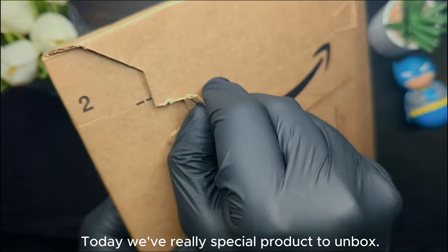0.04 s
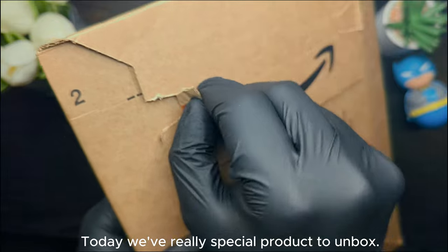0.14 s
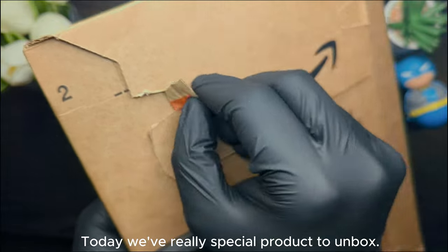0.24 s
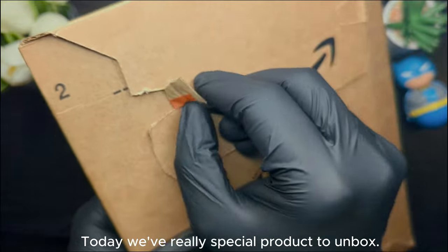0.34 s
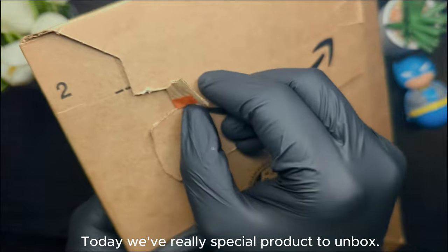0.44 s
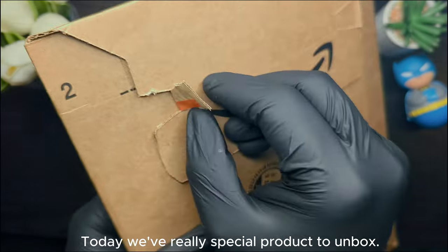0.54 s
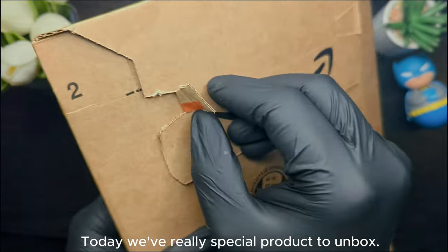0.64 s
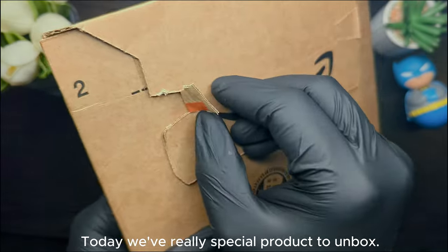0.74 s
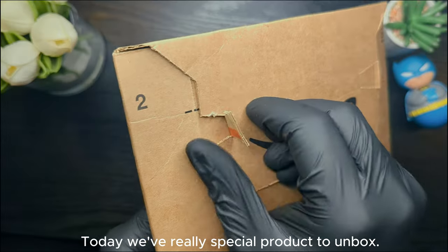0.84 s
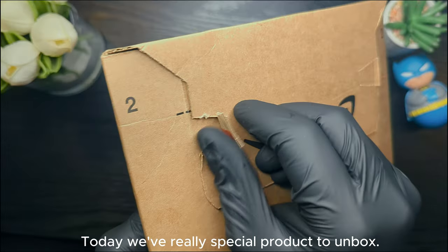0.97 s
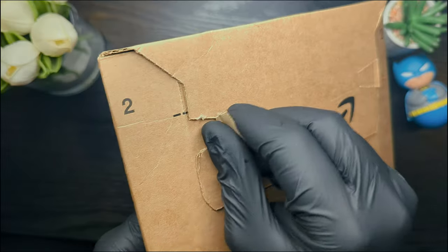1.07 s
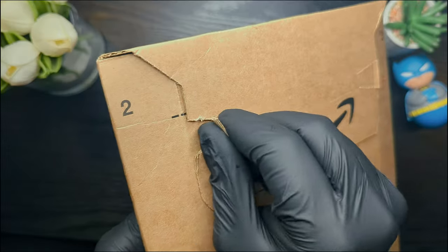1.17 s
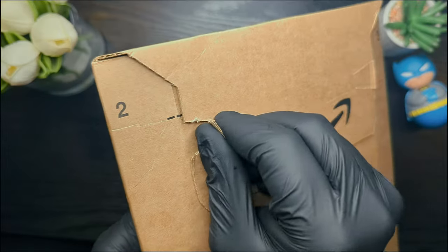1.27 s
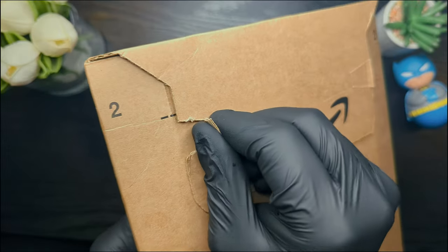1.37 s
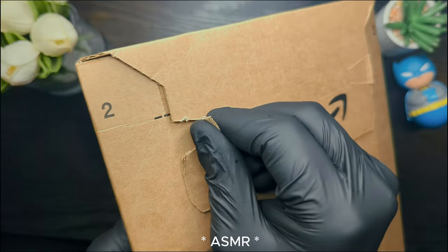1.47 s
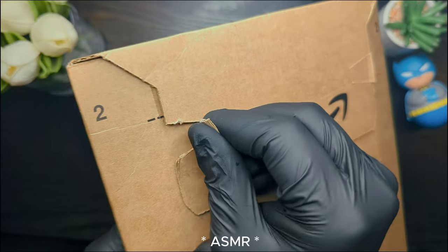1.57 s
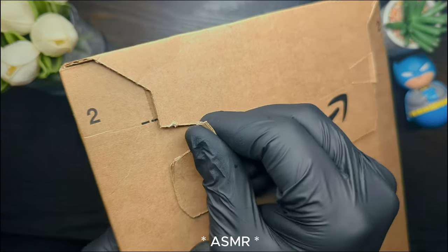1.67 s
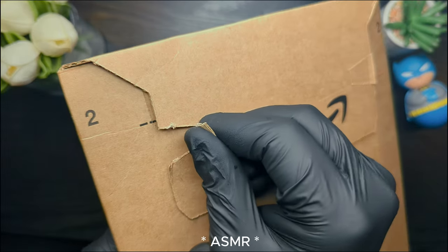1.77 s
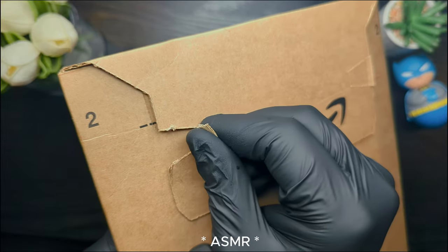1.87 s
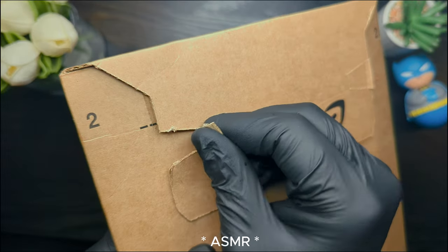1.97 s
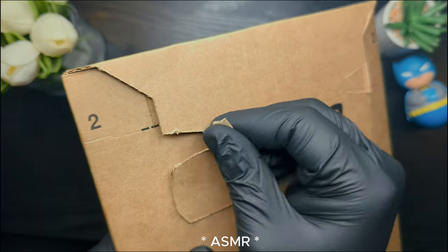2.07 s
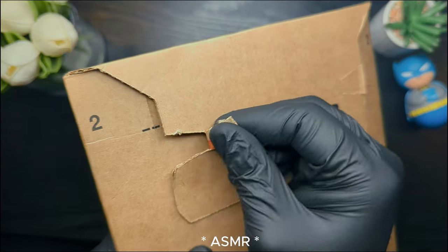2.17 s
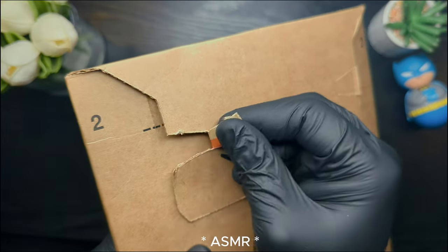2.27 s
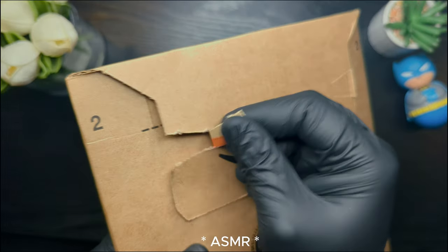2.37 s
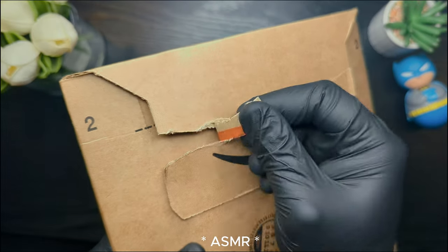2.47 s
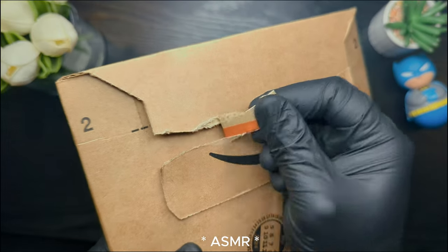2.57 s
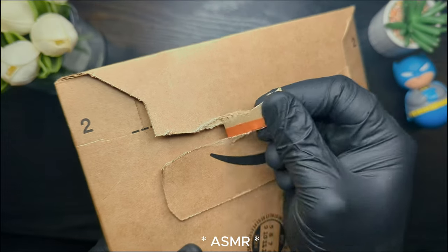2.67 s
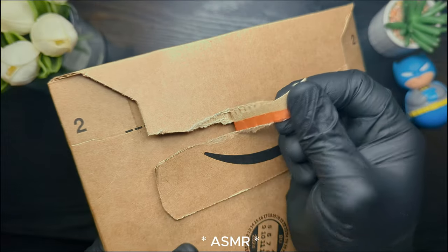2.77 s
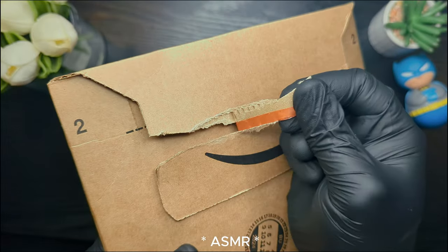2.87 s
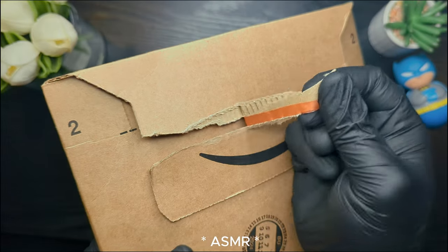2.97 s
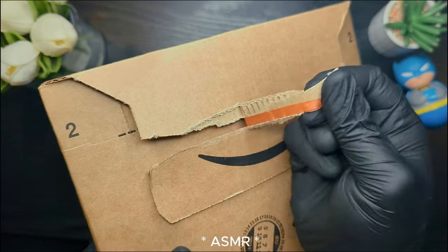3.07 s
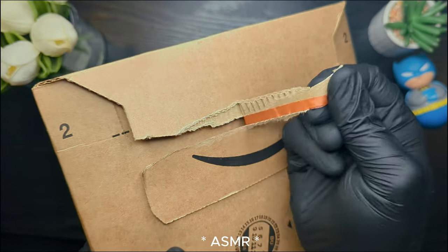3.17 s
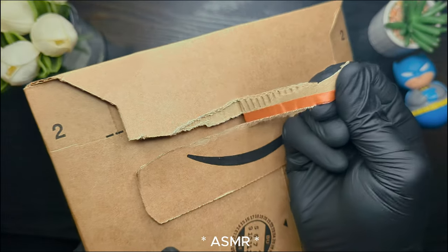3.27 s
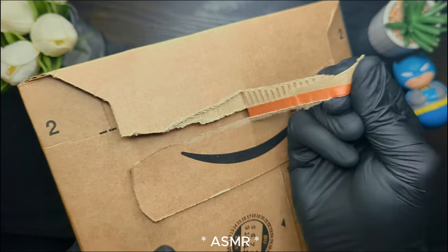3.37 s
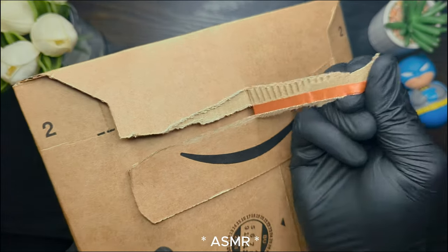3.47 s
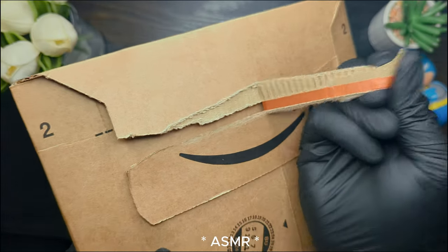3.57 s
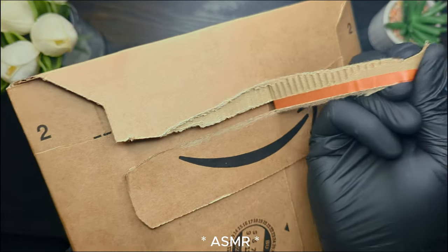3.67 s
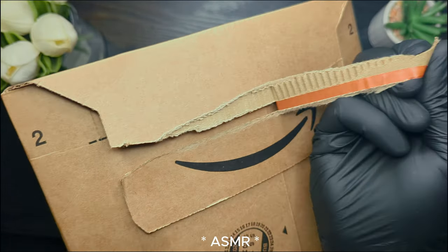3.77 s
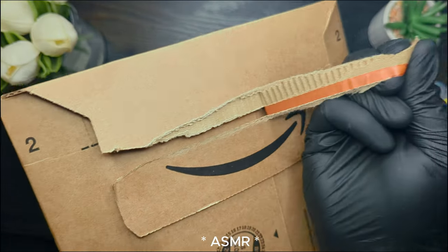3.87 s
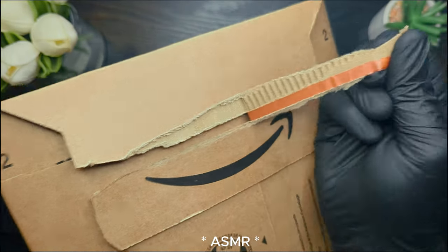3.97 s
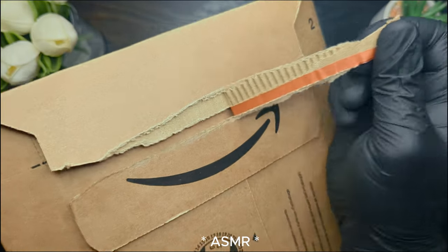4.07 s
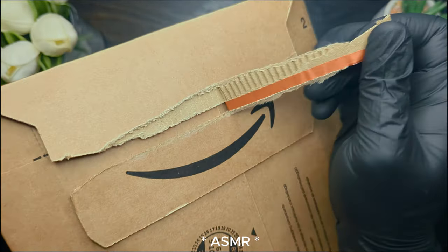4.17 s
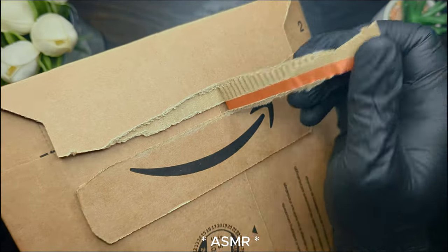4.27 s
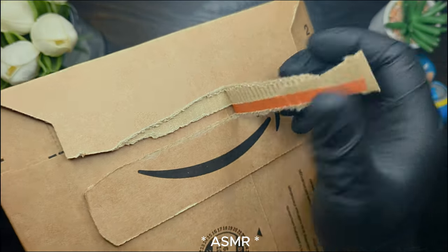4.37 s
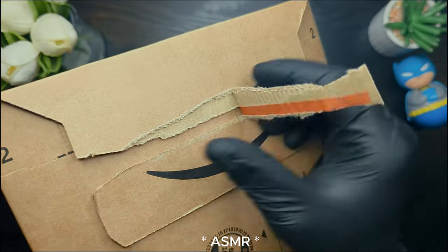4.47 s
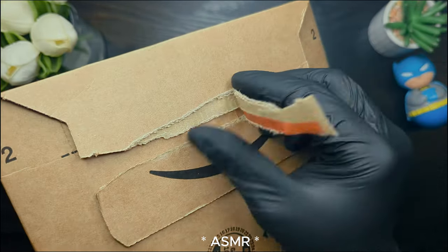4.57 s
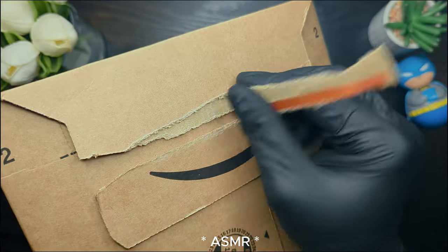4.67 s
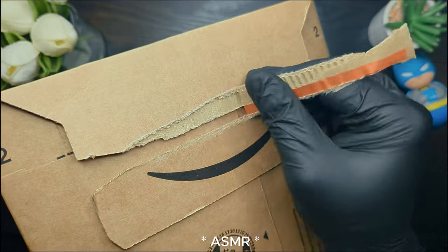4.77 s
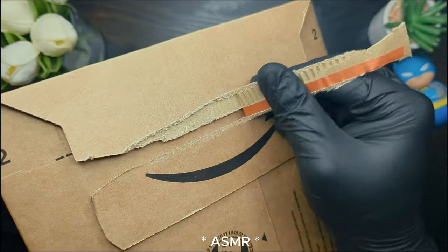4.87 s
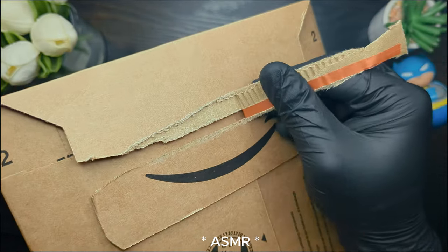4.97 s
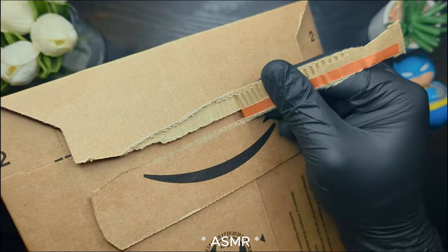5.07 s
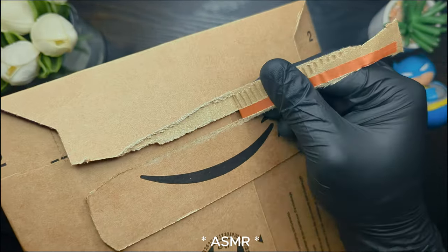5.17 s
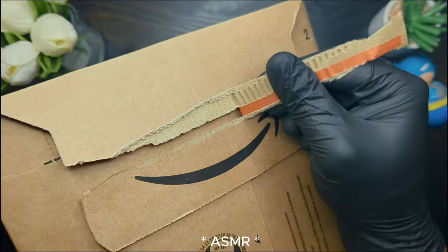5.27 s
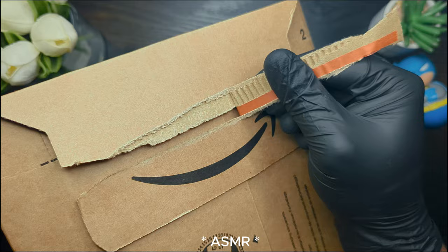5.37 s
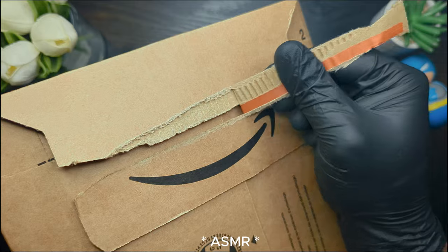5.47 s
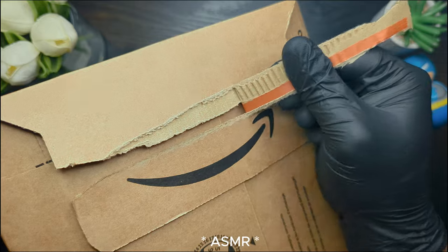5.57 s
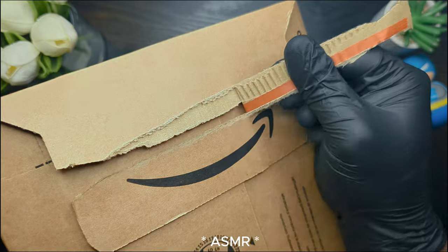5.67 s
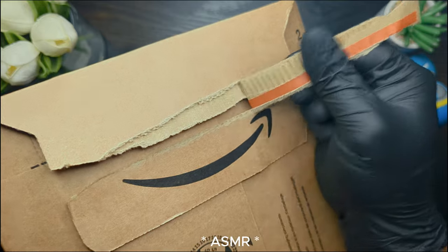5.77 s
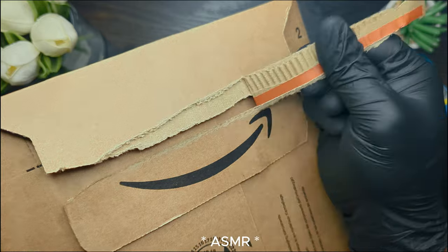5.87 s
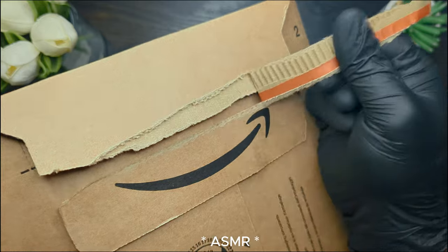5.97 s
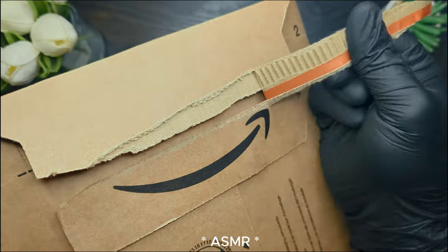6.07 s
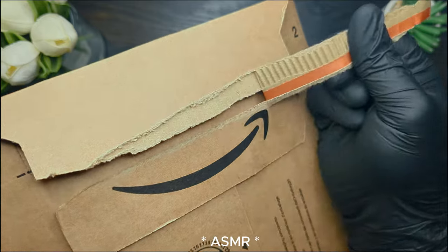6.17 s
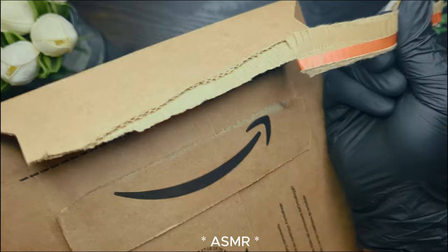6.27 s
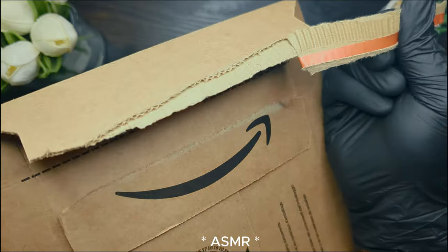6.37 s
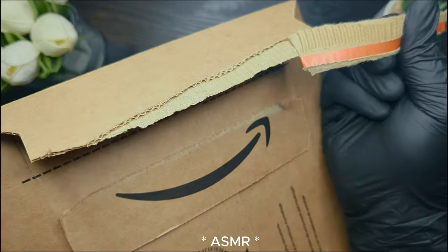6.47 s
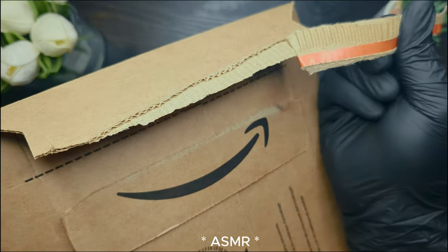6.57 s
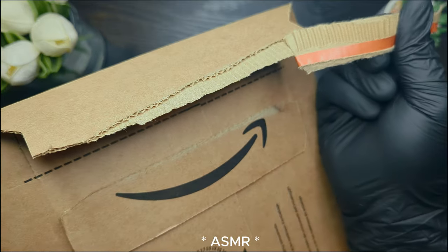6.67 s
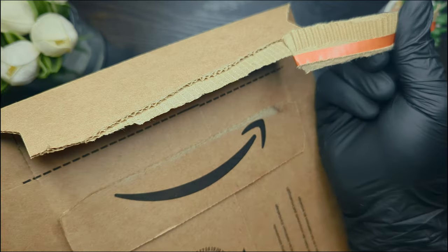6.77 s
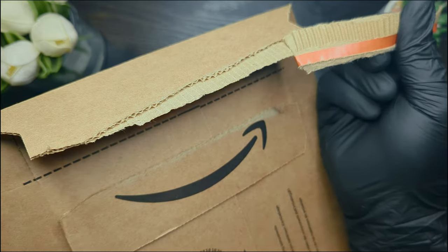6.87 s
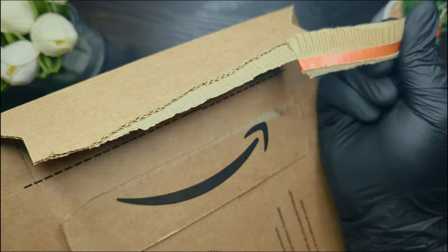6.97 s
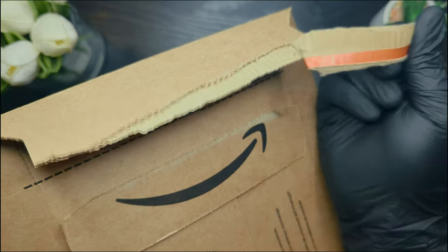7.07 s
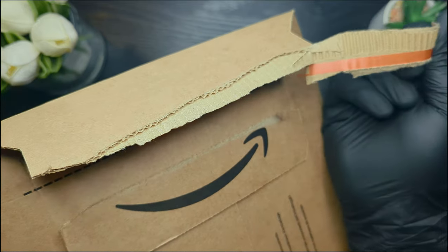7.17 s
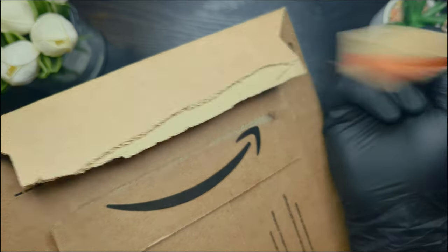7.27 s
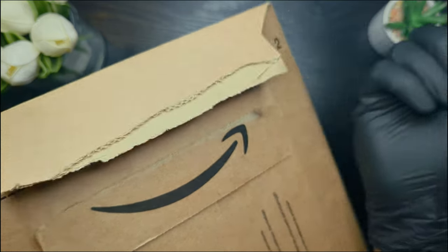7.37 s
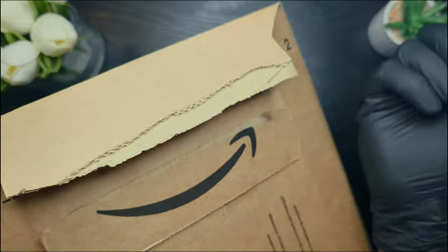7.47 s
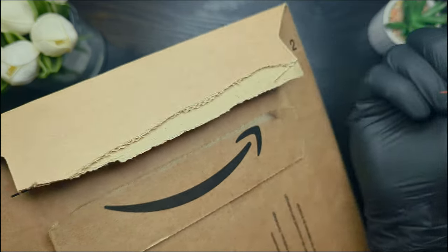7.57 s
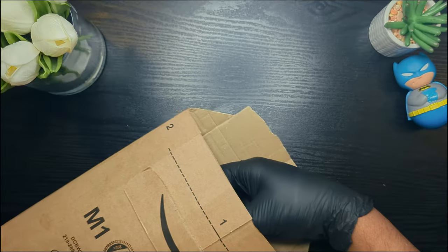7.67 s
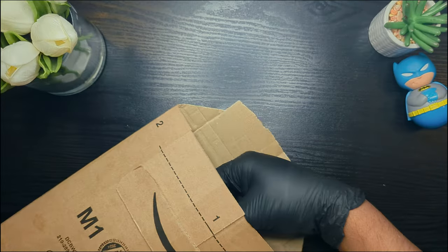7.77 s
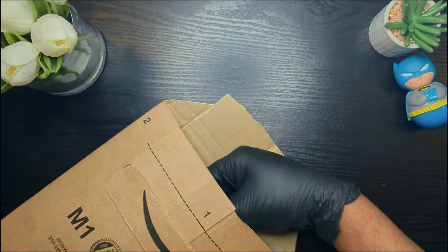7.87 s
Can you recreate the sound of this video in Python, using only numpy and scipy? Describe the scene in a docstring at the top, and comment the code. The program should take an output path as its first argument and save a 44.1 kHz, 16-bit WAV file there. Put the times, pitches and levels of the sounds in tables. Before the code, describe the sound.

Rubber gloves rub and pick softly at a cardboard mailer. Then its pull strip rips in a run of crisp, snapping jerks, each with a small low thump. After a pause of glove rustle and faint creaks, a second run of tearing follows. Glue threads tick, a last short rip frees the strip, and the parcel is handled with light taps. The sound is close and slightly left, in a quiet room.

```python
"""Tearing open a cardboard mailer

Gloved hands rip the pull strip off a corrugated mailer, close up and to the left. The strip lets go in
jerks: each is a burst of snapping fibres that rings flap and panel, with a low thump that falls in
pitch. Between jerks the gloves rub, the board creaks, glue threads tick and the parcel bumps the table.
A quiet room hums behind."""
import sys
import numpy as np
from scipy import signal
from scipy.fft import rfft, irfft, next_fast_len
from scipy.io import wavfile
from scipy.ndimage import uniform_filter1d, map_coordinates

SR = 44100
rng = np.random.default_rng(int(sys.argv[2]) if len(sys.argv) > 2 else 0)


def generate_wav(sig):
    """Save sig (samples, or channels by samples) to the path in sys.argv[1] as 16-bit PCM at SR."""
    pcm = np.round(np.clip(np.atleast_2d(sig).T, -1, 1) * 32767).astype(np.int16)
    wavfile.write(sys.argv[1], SR, pcm)


N = 349713

# Jerks of the strip: start_s, level_db, flap_offset_db, thump_offset_db, swell_ms, length_ms
STRIP_JERKS = [(2.405, -44.5, 3, -13, 0.97, 4.7), (2.435, -26, -1.5, -6.5, 1.3, 7.2),
               (2.4491, -26.5, -5, -8.5, 1.7, 10.5), (2.4671, -21.5, -13, -9, 1.8, 9.9),
               (2.493, -20.5, -9.5, -10.5, 2.1, 10.2), (2.585, -19, -16.5, -18.5, 1.93, 6.7),
               (2.6276, -19, -19, -18, 1.8, 5.6), (2.745, -31.5, -10, -18, 1.9, 8.7),
               (2.7602, -20, -13.5, -11.5, 2.27, 5.8), (2.799, -13.5, -10.5, -18, 1.66, 2.8),
               (2.8221, -17.5, -11.5, -13, 1.55, 7.3), (2.9434, -33.5, -12.5, -30, 2.4, 7.6),
               (2.9579, -14, -13.5, -16, 1.1, 3.9), (2.982, -15.5, -8.5, -15.5, 1.6, 4.5),
               (3.024, -16, -13, -15.5, 1.5, 4.4), (3.1525, -20, -4.5, -12.5, 0.7, 7),
               (3.217, -37.5, -9, -19, 1.2, 3.4), (3.246, -19, -15.5, -18.5, 1.15, 3.4),
               (3.3414, -42, -12.5, -22, 1.3, 14), (3.3628, -16, -12.5, -13.5, 0.77, 6.8),
               (3.4085, -14, -15, -23.5, 0.51, 4.6), (3.491, -17.5, -12.5, -15, 0.77, 3.6),
               (3.5558, -14, -11, -22.5, 0.51, 5.5), (3.611, -15.5, -4.5, -19.5, 0.49, 6.3),
               (3.6379, -19, -9, -16.5, 0.64, 6.7), (3.707, -18.5, -3.5, -24, 0.82, 6.3),
               (3.7707, -18.5, -9.5, -18.5, 1.05, 7), (5.2987, -48, -9, -13, 2.6, 7.6),
               (5.3151, -25, -12, -15, 1.8, 13.6), (5.459, -40.5, -3, -32, 0.67, 2.7),
               (5.4834, -37, -7, -25, 0.44, 12), (5.506, -19, -13, -17.5, 0.93, 8.1),
               (5.6, -20, -17, -26, 1.4, 8.4), (5.69, -45.5, 8, -32, 1.4, 4.3),
               (5.743, -37.5, -17, -35, 2.1, 4.3), (5.7627, -16, -15.5, -19.5, .9, 5.9),
               (5.822, -34, -5, -26, 2.1, 14), (5.8325, -22, -5, -13.5, 1.6, 8.9),
               (5.8731, -19.5, -12.5, -19, 1.5, 6), (5.957, -18.5, -10.5, -23.5, 1.75, 8.1),
               (6.0281, -19.5, -10, -19.5, .8, 8.9), (6.087, -19.5, -9.5, -16, 1.4, 8.4),
               (6.233, -39, -8.5, -22, 3, 7.5), (6.2449, -17.5, -6, -17, .55, 8),
               (6.283, -16, -6, -16.5, 1.5, 15.4), (6.294, -13.5, -8, -17.5, 2, 5.4),
               (7.112, -30, -13, -31, 3.9, 9), (7.128, -27.5, -11, -23, 3.1, 8),
               (7.1474, -22.5, -4, -21, 2.6, 8), (7.165, -29, -5, -15, 3, 8.3),
               (7.3149, -23, -4, -11.5, 1.9, 7.9)]
# Small creases and taps: start_s, level_db, flap_offset_db, thump_offset_db, panel_offset_db
BOARD_CREASES = [(.813, -65.5, -3, -12, -22), (0.89, -60, 2, -18, -20), (1.028, -44.5, 0.5, -24, -16),
                 (1.56, -60, 3, -6, 12.5), (1.618, -63, 11, -3, -8), (1.74, -60, -12, -21, -12),
                 (2.066, -49, -7, -24, -9), (2.09, -50, -14, -30, -25), (2.113, -49, -14, -30, -25),
                 (2.135, -35.5, -17, -32, -27), (2.165, -52, -14, -28, -25), (2.214, -46, -1, -23, -20),
                 (2.237, -48, -12, -28, -20), (2.256, -38, -19, -27, -22), (2.305, -37, -9, -28, -12),
                 (2.325, -46.5, -11, -28, -20), (2.36, -51.5, -12, -28, -22), (3.897, -47.5, -20, -25, -20),
                 (3.914, -42.5, -6, -22, 1), (3.972, -41, -8, -13, -21), (4.157, -49, -10, -18, -15),
                 (4.292, -48, -9, -11.5, -5), (5.198, -60.5, -6, -9, -20.5), (5.24, -59.5, -2, -7, -20),
                 (5.271, -53, 0, -13, -13.5), (5.539, -43.5, -2, -14.5, -17.5),
                 (7.461, -46.5, -12.5, -17, -15), (7.647, -37.5, -10, -18.5, -3.5),
                 (7.679, -37, -5.5, -29, -11), (7.705, -36.5, -16, -19, -13), (7.745, -37, -15, -33, -20),
                 (7.762, -44, -17, -28, -23), (7.804, -32, -9, -22, -27)]
# Pan of the tear, higher is further left: time_s, pan_db
TEAR_PAN = [(.8, 7), (1.05, 16), (1.6, -2), (2.1, 5.5), (2.45, 7.5), (3.4, 7.5), (3.65, 7), (3.8, 5),
            (5.3, 7), (5.55, 6), (5.83, 9.5), (5.97, 6), (6.25, 7), (7.3, 6), (7.7, 4)]
# Bright tone of snapping fibres: frequency_hz, gain_db
FIBRE_EQ = [(1180, -33.5), (2000, 0), (5140, 0), (5770, -3.5), (6470, 0), (7320, -3), (10100, -5),
            (11900, 3.5), (15200, -8.5), (16500, -43.5)]
# Midrange ring of the flap: pitch_hz, width_hz, gain_db
FLAP_MODES = [(1018, 332, 5), (1113, 113, 11), (1417, 366, 5), (1954, 300, -3.5)]
# Hollow ring of the panel: pitch_hz, width_hz, gain_db
PANEL_MODES = [(219.6, 41, -1), (299, 68, -1), (399.5, 94, 0), (549, 113, -3.5)]


def tear():
    """Each jerk frays, bursts and dies; its fibres ring flap and panel over a low thump."""
    snaps, flap, panel, thump = np.zeros((4, 2, N + SR))
    clumps = np.pad(wobble(300), (0, SR))  # fibres break in bunches
    lead = SR // 30
    t = np.arange(-lead, SR // 7) / SR
    after = np.maximum(t, 0)
    crease_swell_ms, crease_length_ms, echo_ms = 0.79, 2.57, 0.25
    jerks = [(*row, -6.5 + 0.66 * row[3]) for row in STRIP_JERKS]  # harder thumps ring the panel more
    creases = [(*row[:4], crease_swell_ms, crease_length_ms, row[4]) for row in BOARD_CREASES]
    for start_s, db, flap_db, thump_db, swell_ms, length_ms, panel_db in jerks + creases:
        onset = round(start_s * SR)
        at = slice(onset - lead, onset - lead + len(t))
        burst = swell(t, swell_ms, length_ms)
        crack = 1 + 0.42 / swell_ms * np.exp(-after / 0.0007) * (t >= 0)  # sudden jerks crack harder
        # A slower jerk parts more stray fibres before and after the burst.
        fray = amp(min(-30 + 8 * swell_ms, -8)) * np.exp((t - after) / 0.0091)
        tail = amp(-20 + 1.5 * min(swell_ms, 2.5) - 60 * after / 0.11)
        strays = np.where(t > 0, tail, fray) * amp(4.5 * clumps[at])
        fibres = crackle((2, len(t)), spike_db=1.7) * amp(1.6 * clumps[at])
        delay = 1 + int(rng.uniform() * echo_ms * SR / 1000)
        fibres = unit(fibres + 0.15 * np.roll(fibres, delay, axis=1))  # the board's echo colours it
        pan = amp((curve(TEAR_PAN, start_s) - 12) / 2 * np.array([[1], [-1]]))
        snaps[:, at] += amp(db - 11) * (burst * crack + strays) * fibres * pan
        flap[:, at] += (amp(db + flap_db - 5.5) * burst * crack + amp(db - 8.5) * strays) * fibres * pan
        knock = amp(db + flap_db + 10.5) / max(swell_ms - 1.2, 1)  # the jumping strip hits the flap
        flap[:, onset + SR // 2000] += knock * pan[:, 0]
        panel[:, at] += amp(db + panel_db + 0.5) * burst * fibres
        pulse = burst ** 5 * (1.1 + np.abs(fibres[0]))
        low_end = signal.fftconvolve(pulse / pulse.sum(), falling_thump(t + lead / SR, start_s))
        thump[0, at] += amp(db + thump_db + 7.5) * low_end[:len(t)]
    bright = filtered(snaps[:, :N], colour(FIBRE_EQ))
    body = filtered(flap[:, :N], modes(FLAP_MODES)) + filtered(panel[:, :N], modes(PANEL_MODES))
    return (stereo(*bright, shade=0.76, alike=0.3, lag_s=0.00011)
            + stereo(*(body + flap_shiver()), shade=0.6, alike=0.59, lag_s=0.00016)
            + stereo(thump[0, :N], 0, shade=0.3, alike=0.85, lag_s=0.00026))


# Tuning of the thump from jerk to jerk: time_s, pitch_ratio
THUMP_TUNING = [(2.4, 0.99), (3.0, 1.025), (3.8, 1), (5.3, 0.96), (6.3, .96), (7.1, 1.3), (7.9, 1.2)]


def falling_thump(t, start_s):
    """Each jerk gives a low thump whose pitch falls as 1 / sqrt(time)."""
    cycles = curve(THUMP_TUNING, start_s) * np.sqrt(t / 0.00166)
    envelope = (1 - np.exp(-t / 0.0011)) * np.exp(-(t / 0.035) ** 1.22)
    return envelope * np.cos(2 * np.pi * cycles)


# Ring of the opened flap: pitch_hz, width_hz, gain_db
SHIVER_MODES = [(560, 60, -17.5), (680, 71, 5), (960, 130, -8), (1960, 600, -1.5), (2400, 280, -0.5),
                (4300, 400, -12.5)]


def flap_shiver(start_s=6.297, level_db=-36, t60_s=0.41):
    """The flap comes free and shivers out in a fading, ringing noise."""
    since = np.arange(N) / SR - start_s
    envelope = (since > 0) * amp(level_db - 60 * np.abs(since) / t60_s)
    return envelope * stereo_noise(modes(SHIVER_MODES))


# Creaks of the gripped panel: start_s, level_db, pitch_hz, length_ms
PANEL_CREAKS = [(.04, -50, 523, 70), (.119, -49, 597, 41), (.25, -51, 556, 48), (1.352, -60.5, 567, 24),
                (1.559, -53.5, 278, 37), (2.084, -49.5, 389, 22), (2.28, -50.5, 407, 26),
                (2.322, -57, 427, 22), (3.904, -41.5, 422, 14), (4.169, -44.5, 431, 35),
                (4.894, -42.5, 397, 47), (5.605, -40, 477, 19), (7.125, -30, 470, 12),
                (7.161, -29.5, 445, 13.7)]
# Faint glove squeaks: start_s, level_db, pitch_hz, length_ms
GLOVE_SQUEAKS = [(.02, -53, 922, 79), (.235, -57, 975, 38), (.37, -63, 943, 52), (4.16, -58, 3400, 65),
                 (4.17, -55, 1247, 90), (4.575, -64, 1000, 165)]


def creaks_and_squeaks():
    """The bent panel and the gloves give short, rough tones that waver in pitch."""
    tones, waver, grain = np.zeros(N), wobble(70), wobble(130)
    t = np.arange(SR // 3) / SR
    for events, swell_ms, waver_depth in (PANEL_CREAKS, 3.6, 0.083), (GLOVE_SQUEAKS, 12, 0.026):
        for start_s, db, pitch_hz, length_ms in events:
            onset = round(start_s * SR)
            at = slice(onset, onset + len(t))
            envelope = swell(t - swell_ms / 1000, swell_ms, length_ms)
            cycles = np.cumsum(pitch_hz * (1 + waver_depth * waver[at])) / SR
            tones[at] += amp(db - 4.5) * envelope * (1 + 0.9 * grain[at]) * np.sin(2 * np.pi * cycles)
    return tones


# Glue threads letting go: start_s, level_db
THREAD_SNAPS = [(6.4532, -48), (6.4657, -32.5), (6.4699, -31), (6.4894, -42), (6.5177, -37.5),
                (6.5401, -36), (6.5469, -42.5), (6.5792, -50), (6.5989, -51), (7.006, -57), (7.0192, -48),
                (7.0483, -47.5), (7.0582, -48.5), (7.08, -39), (7.0946, -37), (7.1161, -29.5),
                (7.124, -23.5), (7.1487, -27)]
# Thin ring of the tape: pitch_hz, width_hz, gain_db
TAPE_MODES = [(6680, 620, 7), (12200, 19000, -5.5)]


def glue_threads():
    """Threads of glue snap under the tape, each a dry tick."""
    ticks = np.zeros((2, N))
    lead = SR // 100
    t = np.arange(-lead, SR // 20) / SR
    envelope = swell(t, swell_ms=0.83, length_ms=3.1)
    for start_s, db in THREAD_SNAPS:
        first = round(start_s * SR) - lead
        ticks[:, first:first + len(t)] += amp(db - 7) * envelope * rng.standard_normal((2, len(t)))
    return filtered(ticks, modes(TAPE_MODES))


# The strip under tension, one curve per pull: time_s, level_db
PULL_CURVES = [
    [(2.43, -40.5), (2.55, -52), (2.8, -61), (3.27, -55.5), (3.37, -64), (3.58, -51.5), (3.67, -50),
     (3.83, -58.5), (3.9, -64)],
    [(5.3, -64), (5.49, -61), (5.61, -56), (5.72, -63.5), (5.82, -50), (5.93, -53.5), (6.08, -47),
     (6.19, -64), (6.27, -54.5)],
]


def strain_power():
    """Power envelope of the two long pulls, which feeds the glove noise and the table rumble."""
    t = np.arange(N) / SR
    return sum(amp(curve(pull, t, left=-200, right=-200)) ** 2 for pull in PULL_CURVES)


# Glove strokes: peak_s, rise_ms_per_10db, fall_ms_per_10db, hiss_db, rasp_db, groan_db
GLOVE_STROKES = [(.005, 50, 52, -63, -48.5, -64), (.055, 40, 58, -62, -57, -54.5),
                 (.13, 60, 69, -67.5, -61, -54.5), (0.259, 67, 48, -62, -56.5, -54.5),
                 (.325, 40, 40, -72, -75, -72), (.39, 34, 57, -62, -60.5, -65.5),
                 (.575, 60, 25, -75, -69.5, -79), (.9, 38, 80, -72, -68.5, -75.5),
                 (1.03, 51, 41, -61.5, -56.5, -67.5), (1.16, 55, 47, -64.5, -63.5, -70),
                 (1.36, 52, 148, -71, -70, -68), (1.57, 67, 58, -67, -60.5, -66),
                 (1.66, 50, 42, -74.5, -72, -72), (2.058, 6, 97, -65, -59, -78),
                 (2.1, 23, 28, -61.5, -56.5, -60), (2.14, 12, 35, -61, -61, -68),
                 (2.22, 2, 40, -57, -57, -58), (2.27, 36, 30, -62, -67, -58.5),
                 (2.31, 16, 73, -59, -54.5, -55.5), (2.42, 36, 60, -53, -64, -70),
                 (3.95, 17, 74, -49, -64, -68), (3.975, 35, 32, -54, -48, -57),
                 (4.015, 48, 39, -49.5, -60, -65), (4.074, 50, 49, -48.5, -53, -59),
                 (4.194, 62, 69, -55.5, -50, -49.5), (4.28, 40, 59, -65.5, -60, -61),
                 (4.42, 62, 80, -77.5, -74.5, -72), (4.565, 81, 56, -64.5, -60.5, -65),
                 (4.67, 60, 62, -75.5, -67.5, -82), (4.792, 57, 90, -60, -62.5, -72),
                 (4.922, 46, 54, -60, -53, -58), (5.08, 80.5, 120, -75, -71.5, -79.5),
                 (5.29, 60, 30, -68, -67, -71.5), (6.36, 44, 58, -55, -44, -47),
                 (6.473, 18, 60, -52, -48, -62), (6.56, 41, 65, -72, -62.5, -70),
                 (6.8, 201.5, 149, -76.5, -72.5, -75), (7.06, 71.5, 30, -70, -66, -75),
                 (7.131, 17.5, 38, -39.5, -43, -46.5), (7.16, 31.5, 18, -36.5, -32, -45),
                 (7.2, 21, 74, -50, -47, -49), (7.378, 79, 140, -60.5, -55.5, -61.5),
                 (7.48, 40, 54, -69, -66, -78), (7.649, 3.5, 105, -51.5, -54, -53),
                 (7.74, 30, 21, -67, -63, -52), (7.767, 15, 40, -50, -49.5, -68),
                 (7.826, 40, 53, -54.5, -52, -60), (7.92, 40, 50, -60.5, -61, -72)]
# Tone of the glove hiss: frequency_hz, gain_db
GLOVE_EQ = [(1180, -27), (2000, 1.5), (3400, 1), (4710, -5), (6360, -7.5), (7260, -9), (13500, -9),
            (16100, -28), (16500, -36.5)]
# Treble ride on that hiss: time_s, gain_db
HISS_TREBLE = [(0, -10), (.4, -17), (1.03, -7), (1.4, -15), (2.05, 0), (2.3, -15), (2.7, 1), (3.5, -1.5),
               (3.93, -7), (4.03, 5), (4.1, -6.5), (4.2, -13.5), (4.6, -4), (5.05, -24), (5.6, -2.5),
               (6.3, -3.5), (6.52, 4.5), (6.9, -21), (7.1, 1), (7.55, -15), (7.7, -3.5)]


def glove_rub():
    """Rubber slides on board: a hiss, a rasp in the flap and a groan in the panel."""
    peak_s, rise_ms, fall_ms, *levels_db = np.transpose(GLOVE_STROKES)
    strain = strain_power()
    hiss, rasp, groan = (np.sqrt(swell_power(peak_s, rise_ms, fall_ms, db) + strain * amp(send_db) ** 2)
                         for db, send_db in zip(levels_db, (0, -3.5, -4)))
    slip = wobble(45)  # stick and slip shakes hiss and rasp together
    grit = crackle((2, 2, N), spike_db=1.4)
    friction = filtered(patchy(grit[0], depth_db=1.8), colour(GLOVE_EQ))
    treble = filtered(friction, lambda hz: 1 / (1 + (6500 / (hz + 1)) ** 6))
    treble_gain = amp(curve(HISS_TREBLE, np.arange(N) / SR) + 4.5)
    hiss = hiss * amp(2.4 * slip + 1.1 * wobble(160)) * (friction + (treble_gain - 1) * treble)
    flap_ring = filtered(patchy(grit[1], depth_db=3), modes(FLAP_MODES))
    rasp = rasp * amp(0.5 * slip + 0.5 * wobble(27)) * flap_ring
    groan = groan * amp(2.5 * wobble(25)) * stereo_noise(modes(PANEL_MODES))
    return (stereo(*hiss, shade=0.54, alike=0.21, lag_s=0.00014)
            + stereo(*(groan + rasp), shade=0.09, alike=0.65, lag_s=0.00018))


# The parcel bumping the table: peak_s, level_db
TABLE_BUMPS = [(.2, -51), (.32, -54), (.38, -55), (.5, -67), (.99, -56), (1.06, -54), (1.17, -55),
               (1.36, -51), (1.64, -53), (2.26, -58), (2.656, -35.5), (3.655, -40), (3.972, -46.5),
               (4.14, -49), (4.31, -58), (4.45, -56), (4.61, -56), (4.71, -59), (4.86, -51.5), (5.15, -56),
               (6.51, -53), (6.62, -53.5), (6.71, -57), (6.79, -54.5), (6.88, -54), (7.05, -53.5),
               (7.16, -44), (7.684, -47.5), (7.828, -38.5)]
# Deep tone of the table: frequency_hz, gain_db
TABLE_EQ = [(15, -38.5), (25, -22.5), (59, -1), (73, -12), (87, -14), (200, -29.5), (260, -81), (440, -120)]


def table_rumble():
    """Bumps and pulls rumble through the table over a faint, wavering bed."""
    peak_s, db = np.transpose(TABLE_BUMPS)
    bumps = swell_power(peak_s, rise_ms=26, fall_ms=24, db=db)
    bed = amp(-66.5 + 5 * wobble(12))
    envelope = np.sqrt(bumps + strain_power() * amp(2) ** 2 + bed ** 2)
    rumble = envelope * stereo_noise(colour(TABLE_EQ))
    return stereo(*rumble, shade=0, alike=0.9, lag_s=0.00015)


# Decay of the room: frequency_hz, t60_s
ROOM_DECAY = [(200, 0.2), (1200, 0.22), (4000, 0.15), (12000, 0.17)]


def room_reverb(x):
    """A short tail without bass, each frequency dying at its own speed."""
    hz, t, spectrum = signal.stft(rng.standard_normal((2, SR // 2)), SR, nperseg=256)
    decay = amp(-60 * t / along(ROOM_DECAY, hz)[:, None])
    tail = signal.istft(spectrum * (hz > 250)[:, None] * decay, SR, nperseg=256)[1]
    predelayed = np.pad(x, ((0, 0), (300, 0)))
    return signal.fftconvolve(predelayed, tail / np.linalg.norm(tail[0]), axes=1)[:, :N]


# Tone of the quiet room: frequency_hz, gain_db
ROOM_EQ = [(88, -37.5), (150, -1), (336, -19.5), (847, -17), (1090, -14), (1900, -17.5), (3100, -22.5),
           (5820, -28.5), (14400, -38), (16500, -49)]


def room_tone():
    """A soft, humming noise whose level flutters slightly."""
    return amp(-76.5 + 1.2 * wobble(54)) * stereo_noise(colour(ROOM_EQ))


# Shadow on the microphone's far side at full shade: frequency_hz, left_over_right_db
FAR_SIDE_SHADOW = [(60, -1), (180, 0), (550, 5), (1650, 14.5), (4970, 14.5), (15000, 15.5)]


def stereo(direct, indirect, shade, alike, lag_s):
    """The source sits left: the right side hears it later, shaded and partly by another path."""
    right = np.sqrt(alike) * direct + np.sqrt(1 - alike) * indirect
    side = np.array([[1], [-1]])
    return filtered(np.array([direct, right]), lambda hz:
                    amp(side * shade * along(FAR_SIDE_SHADOW, hz) / 2)
                    * np.exp(side * 1j * np.pi * hz * lag_s))


def amp(db):
    return 10 ** (np.asarray(db) / 20)


def unit(x):
    return x / np.sqrt(np.mean(x ** 2) + 1e-20)


def curve(points, t, **ends):
    """(time_s, value) points joined by straight lines."""
    return np.interp(t, *np.transpose(points), **ends)


def along(points, hz):
    """(frequency_hz, value) points joined on a log axis."""
    knots_hz, values = np.transpose(points)
    return np.interp(np.log(hz + 1), np.log(knots_hz + 1), values)


def swell(t, swell_ms, length_ms):
    """A quick rise to time 0, then a rounded fall."""
    return np.exp(1000 * np.minimum(t, 0) / swell_ms - (1000 * np.maximum(t, 0) / length_ms) ** 2)


def swell_power(peak_s, rise_ms, fall_ms, db):
    """Summed power of swells that climb 10 dB per rise_ms and drop 10 dB per fall_ms."""
    peak_s, rise_ms, fall_ms, db = (np.reshape(v, (-1, 1)) for v in (peak_s, rise_ms, fall_ms, db))
    grid_ms = np.arange(0, N, 32) / SR * 1000
    late_ms = grid_ms - 1000 * peak_s
    drop_db = 10 * np.where(late_ms < 0, -late_ms / rise_ms, late_ms / fall_ms)
    return np.interp(np.arange(N) / SR * 1000, grid_ms, np.sum(amp(db - drop_db) ** 2, 0))


def wobble(rate):
    """A smooth random curve, rate knots a second."""
    return map_coordinates(rng.standard_normal(int(N * rate / SR) + 4), [np.arange(N) * rate / SR])


def crackle(size, spike_db):
    """Noise with stray spikes, like fibres breaking."""
    return unit(rng.standard_normal(size) * amp(spike_db * rng.exponential(size=size)))


def patchy(x, depth_db):
    """Random patches of gain over time and frequency, so each stroke catches other bands."""
    spectrum = signal.stft(x, nperseg=512)[2]
    patches = uniform_filter1d(rng.standard_normal(spectrum.shape[1:]), size=4, axis=0)
    patches = unit(uniform_filter1d(patches, size=16, axis=1))
    return unit(signal.istft(spectrum * amp(depth_db * patches), nperseg=512)[1][:, :N])


def stereo_noise(response):
    return filtered(rng.standard_normal((2, N)), response)


def filtered(x, response):
    """x through a complex frequency response."""
    size = next_fast_len(N + SR // 2)
    return irfft(rfft(x, size) * response(np.fft.rfftfreq(size, 1 / SR)), size)[..., :N]


def keep_power(response):
    """The response scaled so that white noise keeps its power."""
    return lambda hz: response(hz) / np.sqrt(np.mean(np.abs(response(hz)) ** 2))


def colour(eq):
    """The response of an EQ curve."""
    return keep_power(lambda hz: amp(along(eq, hz)))


def modes(table):
    """The response of parallel resonances, alternating in polarity."""
    return keep_power(lambda hz: sum(
        (-1) ** k * amp(db) * 1j * hz * width / (pitch ** 2 - hz ** 2 + 1j * hz * width)
        for k, (pitch, width, db) in enumerate(table)))


def scene():
    """Tear, creaks and ticks feed the reverb; gloves, table and room tone stay dry."""
    near = tear()
    details = creaks_and_squeaks() + glue_threads()
    near += stereo(*details, shade=0.25, alike=0.87, lag_s=0.00016)
    return near + amp(-10) * room_reverb(near) + glove_rub() + table_rumble() + room_tone()


def record(dry):
    """The microphone drops the deepest bass; the very top is cut off."""
    low_cut_hz, top_hz = 40, 16700
    return filtered(dry, lambda hz: (hz < top_hz) / np.sqrt(1 + (low_cut_hz / (hz + 1)) ** 9))


dry = scene()
out = record(dry)
generate_wav(out)
```